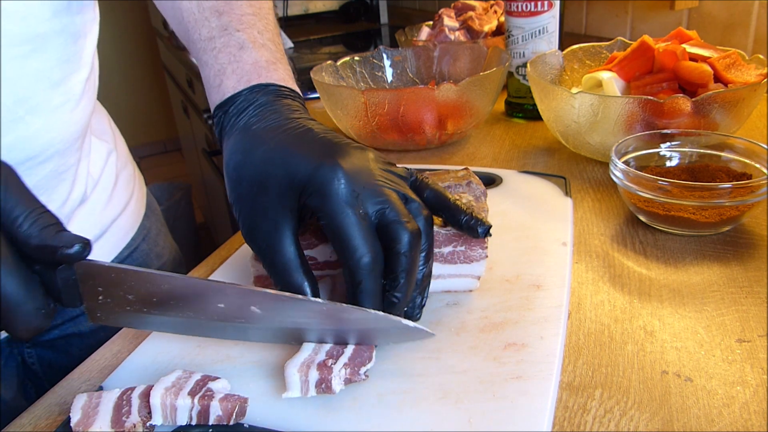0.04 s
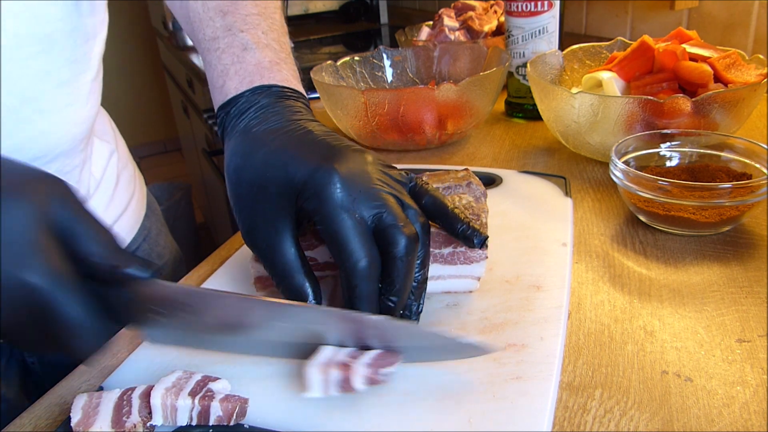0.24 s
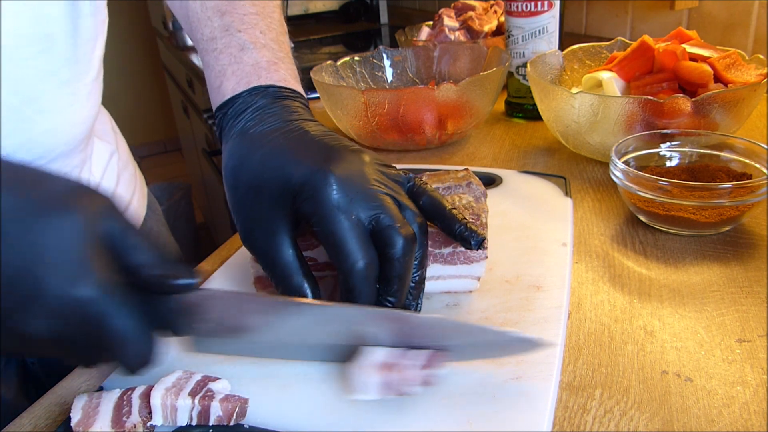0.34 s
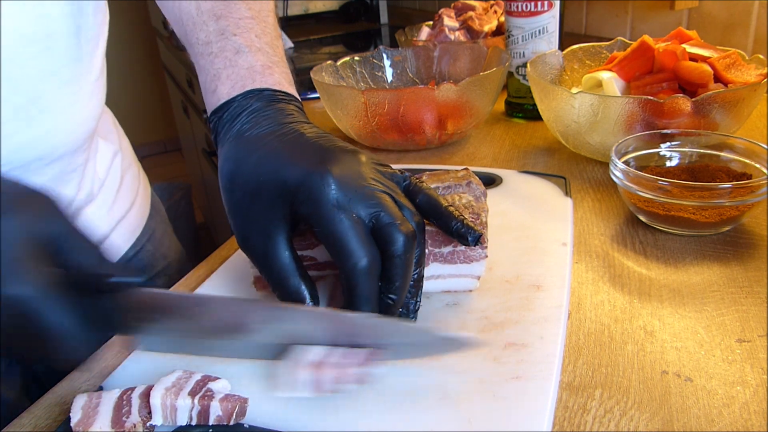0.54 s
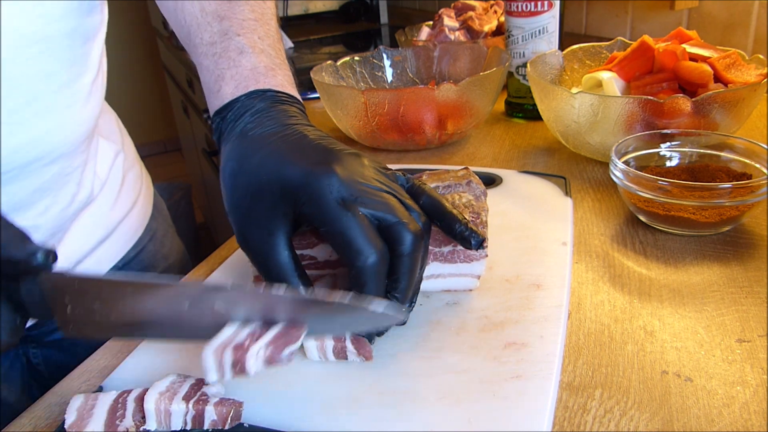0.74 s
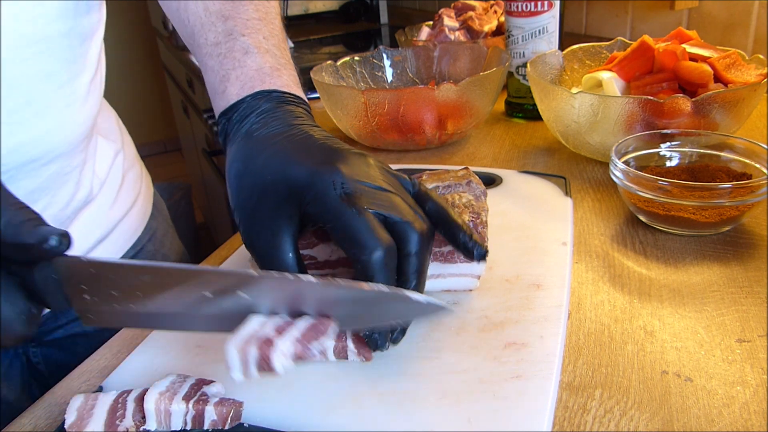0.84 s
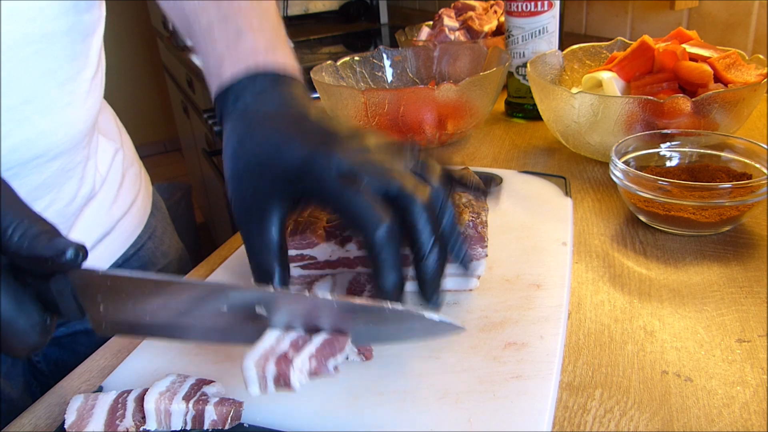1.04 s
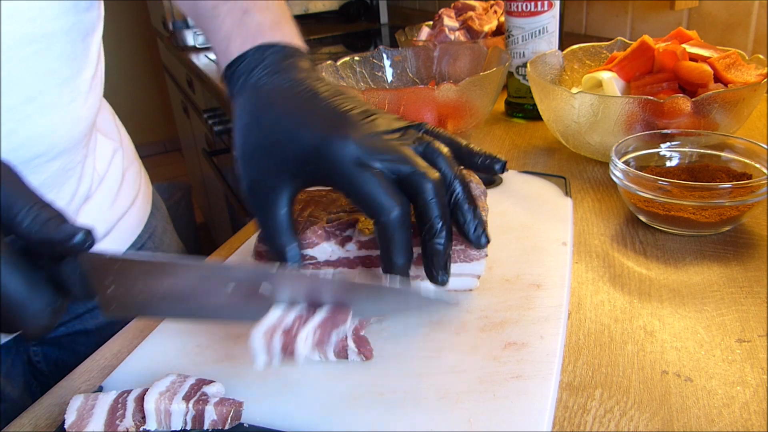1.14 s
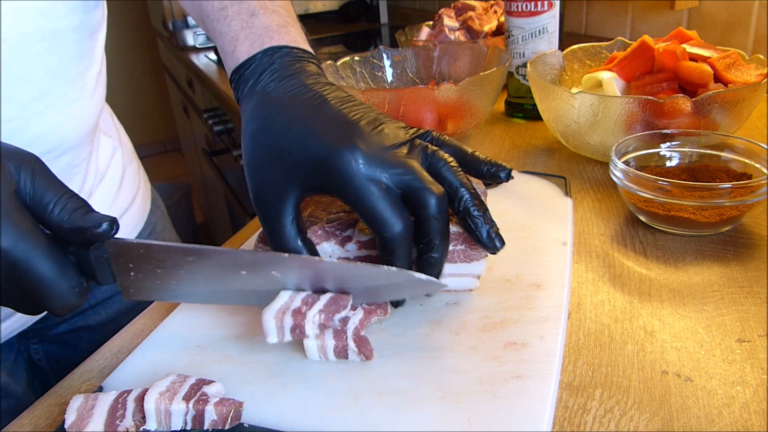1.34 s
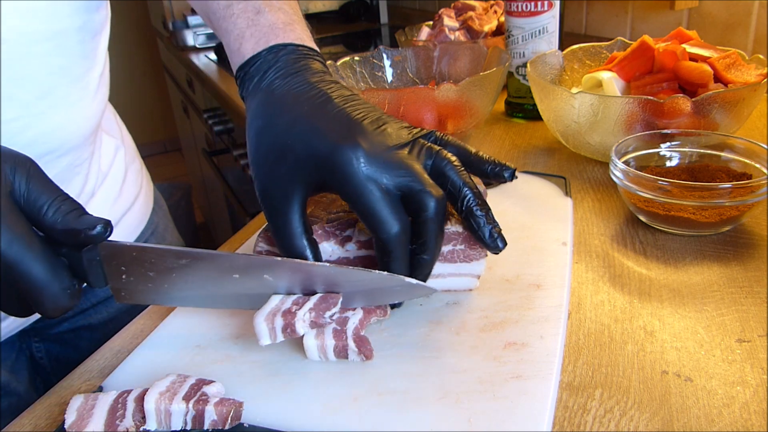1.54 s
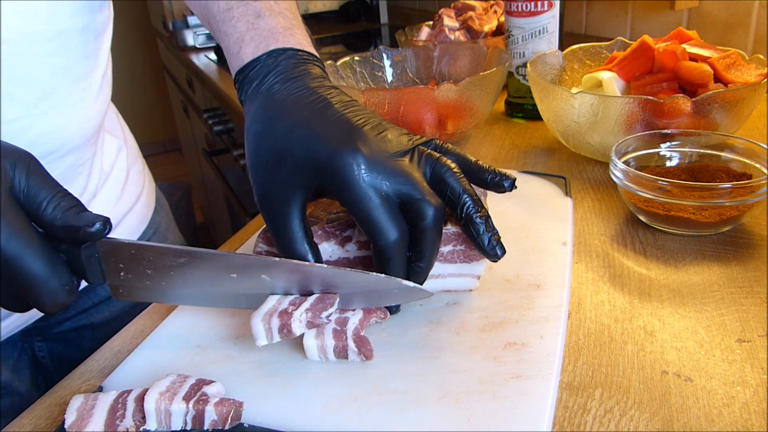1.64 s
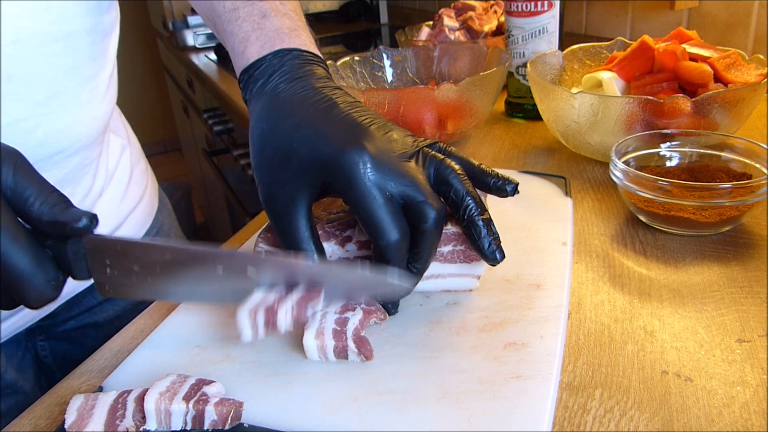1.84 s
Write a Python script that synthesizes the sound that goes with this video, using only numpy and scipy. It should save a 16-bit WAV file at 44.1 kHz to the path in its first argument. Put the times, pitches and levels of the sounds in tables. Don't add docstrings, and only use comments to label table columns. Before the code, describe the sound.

A chef's knife slices bacon in two quick draws, scraping and ringing on a ridged plastic board, the first squeaking thinly; wet crackles follow, then faint glove rustles and finger taps, close stereo microphone, small kitchen.

```python
import sys
import numpy as np
from scipy import signal
from scipy.fft import rfft, irfft, next_fast_len
from scipy.io import wavfile
from scipy.ndimage import uniform_filter1d

SR = 44100
rng = np.random.default_rng(int(sys.argv[2]) if len(sys.argv) > 2 else 0)


def invert_db(x):
    u = np.asarray(x, float) / 20
    return 10 ** u


def wav_out(sig):
    wavfile.write(sys.argv[1], SR, np.round(np.clip(np.atleast_2d(sig).T, -1, 1) * 32767).astype(np.int16))


N = 83790


def seconds():
    return np.arange(N) / SR


def rms_one(x):
    return x / np.sqrt(np.mean(x ** 2) + 1e-20)


def in_time(rows):
    s, *columns = np.transpose(rows)
    return [np.interp(seconds(), s, c) for c in columns]


def fade(rows):
    start, end = rows[0][0], rows[-1][0]
    return np.interp(seconds(), [start - .02, start, end, end + .02], [0, 1, 1, 0])


def bump(centre, reach):
    return np.exp(-.5 * ((seconds() - centre) / reach) ** 2)


def colour(x, points):
    hz, db = np.transpose(points)
    bins = np.arange(N // 2 + 1) * SR / N + 1
    return irfft(rfft(x) * invert_db(np.interp(np.log(bins), np.log(hz), db)), N)


def drift(rate):
    r = np.exp(-2 * np.pi * rate / SR)
    settled = signal.lfilter([1], [1, -2 * r, r * r], rng.standard_normal(N + SR))[SR:]
    return rms_one(settled)


def resonate(x, hz, width_hz):
    r = np.exp(-np.pi * width_hz / SR)
    zeros = [(1 - r * r) / 2, 0, (r * r - 1) / 2]
    poles = [1, -2 * r * np.cos(2 * np.pi * hz / SR), r * r]
    return signal.lfilter(zeros, poles, x + 1e-18)


def grains(per_s, spread_db):
    sizes = invert_db(spread_db * np.minimum(rng.exponential(1, N), 4)) * rng.choice([-1, 1], N)
    return rms_one(sizes * (rng.random(N) < per_s / SR))


def sustained(chatter, hz, width_hz):
    steady_share, steady_s = .7, .012
    ring = rms_one(resonate(chatter, hz, width_hz))
    power = uniform_filter1d(ring ** 2, size=int(steady_s * SR)) + .02
    return rms_one(ring / power ** (steady_share / 2))


# (time [s], pressure [dB], weight on the board [dB], sheen [dB])
FIRST_DRAW = [
    (.14, -83, -1, 3),
    (.2, -56.5, 7, 8.5),
    (.3, -42, 8.5, 1),
    (.34, -38, 2.5, 2),
    (.37, -42, -7, 1.5),
    (.4, -40, -8, 1.5),
    (.455, -40.5, -13, -1),
    (.49, -48, -2, -1.5),
    (.52, -66, 18, 11),
]
SECOND_DRAW = [
    (.5, -60.5, 10, 3),
    (.54, -45.5, -4, -3.5),
    (.6, -36, -1, 0.5),
    (.64, -36.5, -1.5, 1),
    (.7, -40.5, 0, -6),
    (.735, -46.5, 12.5, 2),
    (.77, -54, 11.5, 5),
    (.81, -65, 12, 0),
]
# (frequency [Hz], level [dB per Hz])
FIRST_EDGE = [(110, -59), (180, -15), (290, -21), (677, -8), (901, -14), (1540, -4), (8380, -13),
              (14300, -25.5)]
SECOND_EDGE = [(88, -73), (150, -47), (185, -39.5), (664, -8.5), (1820, -6), (4200, -9), (8230, -14.5),
               (14300, -27)]
# (frequency [Hz], width [Hz], level [dB], time the contact passes [s], reach [s])
FIRST_BODY = [(341, 18, -4, 0.357, 0.032), (665, 14, 0.5, 0.341, 0.047), (670, 53, 1, 0.255, 0.014),
              (1270, 40, -14, 0.5, .03), (1480, 32, 5, 0.477, 0.027), (1618, 35, 1.5, 0.334, 0.018),
              (1540, 43, 2.5, .395, 0.023), (1712, 6, 5.5, 0.42, 0.015), (2320, 55, -1, 0.339, 0.013),
              (2430, 50, -5, .40, .03), (2920, 17, -5, 0.429, 0.036), (3840, 67, -1, 0.363, 0.038),
              (4210, 35, -1, 0.477, 0.034), (6000, 47, 5, 0.51, .015)]
SECOND_BODY = [(1570, 45, 2.5, .535, 0.023), (2410, 190, 1.5, 0.552, 0.047), (683, 12, -4, 0.53, 0.034),
               (668, 12, -5.5, 0.671, 0.048), (950, 64, -4.5, 0.622, 0.043), (1040, 90, -4, 0.703, 0.039),
               (1820, 22, 1.5, 0.62, 0.02), (1758, 29, 0.5, 0.712, 0.04), (2004, 36, -1.5, .68, 0.02),
               (2935, 35, -3.5, 0.665, 0.024), (3930, 220, 2, 0.705, 0.048), (4630, 20, -3.5, .625, 0.014),
               (8200, 900, -3.5, 0.628, 0.063), (1396, 16, 1, 0.728, 0.038)]
BODY_DB, BOARD_HZ, SHEEN_HZ = -7, 875, 6500
RIDGES_PER_S, RIDGE_SPREAD_DB, FLUTTER_DB = 6000, 2, 1.6
STRAY_MODES, STRAY_DB, STRAY_REACH_S, STRAY_CYCLES = 40, -13, .02, 30
DRAW_TOP_HZ = 14300


def draw(rows, edge, body):
    pressure_db, weight_db, sheen_db = in_time(rows)
    start, end = rows[0][0], rows[-1][0]
    chatter = grains(RIDGES_PER_S, RIDGE_SPREAD_DB)
    rings = np.zeros(N)
    for hz, width_hz, db, s, reach in body:
        rings += invert_db(db) * sustained(chatter, hz, width_hz) * bump(s, reach)
    for decades, place in rng.random((STRAY_MODES, 2)):
        hz = 900 * 10 ** decades
        stray = rms_one(resonate(chatter, hz, hz / STRAY_CYCLES))
        stray_gain = invert_db(STRAY_DB - BODY_DB - 6.6 * decades)
        rings += stray_gain * stray * bump(start + place * (end - start), STRAY_REACH_S)
    ridges = grains(RIDGES_PER_S, RIDGE_SPREAD_DB) * invert_db(FLUTTER_DB * drift(38))
    scrape = rms_one(colour(ridges, edge))
    low = signal.sosfilt(signal.butter(2, BOARD_HZ, fs=SR, output="sos"), scrape)
    high = signal.sosfilt(signal.butter(2, SHEEN_HZ, "high", fs=SR, output="sos"), scrape)
    scrape = scrape + (invert_db(weight_db) - 1) * low + (invert_db(sheen_db) - 1) * high
    top_cut = signal.cheby2(10, 40, DRAW_TOP_HZ * 1.04, fs=SR, output="sos")
    return signal.sosfilt(top_cut, scrape + invert_db(BODY_DB) * rings) * invert_db(pressure_db) * fade(rows)


# (time [s], pitch [Hz], lower whistle [dB], upper whistle [dB])
SQUEAK_PATH = [
    (.16, 6250, -68, -95),
    (.19, 7250, -60, -67),
    (.213, 7740, -61, -66),
    (.27, 7700, -59, -67),
    (.303, 8350, -55, -78),
    (.35, 8200, -56, -80),
    (.41, 7300, -56, -75),
    (.455, 6870, -54, -72),
    (.54, 6300, -63, -71),
]
UPPER_OFFSET_HZ, UPPER_CLIMB_HZ_PER_S, SQUEAK_WOBBLE = 3090, 2500, 0.0028


def squeak():
    hz, lower_db, upper_db = in_time(SQUEAK_PATH)
    hz = hz * (1 + SQUEAK_WOBBLE * drift(145))
    lower = np.sin(2 * np.pi * np.cumsum(hz) / SR) * invert_db(lower_db + 1.1 * drift(40))
    upper_hz = hz + UPPER_OFFSET_HZ + UPPER_CLIMB_HZ_PER_S * (seconds() - SQUEAK_PATH[2][0])
    upper = np.sin(2 * np.pi * np.cumsum(upper_hz) / SR) * invert_db(upper_db + 2.9 * drift(40))
    return (lower + upper) * invert_db(3.5) * fade(SQUEAK_PATH)


# (time [s], peak level [dB], pitch [Hz], crackle tail [s])
FAT_SNAPS = [(.339, -34, 2520, 0.0089), (.3835, -33, 2500, .008), (.5247, -42, 2000, .008),
             (0.599, -36, 2330, 0.0089), (0.853, -33.5, 7000, 0.011), (.859, -23, 6000, 0.057),
             (0.86, -49, 6500, 0.0084), (.875, -46, 8500, .05), (0.9172, -32.5, 9700, 0.067),
             (0.9177, -30, 4800, 0.065), (1.19, -39.5, 5500, .008), (1.232, -45, 5500, .01)]
CRACKLE_DB, CRACKLES_PER_S = -16, 7000


def snaps():
    out, fibres, t = np.zeros(N), grains(CRACKLES_PER_S, 2.9), seconds()
    for s, db, hz, tail in FAT_SNAPS:
        burst = invert_db(CRACKLE_DB) * fibres * (t > s) * np.exp(-3 * np.abs(t - s) / tail)
        burst[int(s * SR)] = 1.8
        band = signal.butter(3, [0.57 * hz, min(1.61 * hz, 13000)], "band", fs=SR, output="sos")
        out += invert_db(db) * signal.sosfilt(band, burst + 1e-18)
    return out


# (time [s], level [dB])
HAND_MOVES = [(0, -67), (.03, -61.5), (.16, -58), (.24, -53), (.78, -60.5), (.84, -57.5), (1.0, -64),
              (1.2, -61.5), (1.36, -68.5), (1.45, -59.5), (1.65, -66), (1.75, -60), (1.9, -59)]
# (frequency [Hz], level [dB per Hz])
RUSTLE_COLOUR = [(530, -3), (900, -3), (933, -5), (1380, 0.5), (2100, -2.5), (2420, -9), (5310, -4),
                 (15500, -20.5)]
# (time [s], length [s], level [dB], pitch [Hz])
GLOVE_RUBS = [(1.092, 0.022, -71, 1400), (1.097, 0.028, -67.5, 4900), (1.105, 0.025, -67, 2030),
              (1.147, 0.023, -58, 8300), (1.148, 0.084, -66, 5150), (1.235, 0.017, -77, 1820),
              (1.254, 0.033, -63, 8240), (1.44, 0.047, -69, 5130), (1.553, 0.022, -65, 693),
              (1.562, 0.012, -63, 9500), (1.593, 0.033, -68, 11100), (1.688, 0.013, -64.5, 8200),
              (1.85, 0.18, -62.5, 5160), (1.877, 0.11, -71, 2150)]
RUSTLE_DB, RUB_SHARPNESS = -2.5, 2.5


def hands():
    db, = in_time(HAND_MOVES)
    fine, swells = grains(9000, 3.1), np.zeros(N)
    for s, length, rub_db, hz in GLOVE_RUBS:
        swells += invert_db(rub_db) * rms_one(resonate(fine, hz, hz / RUB_SHARPNESS)) * bump(s, length / 2)
    flicker_db = drift(25)
    rustle = rms_one(colour(grains(9000, 1.47), RUSTLE_COLOUR))
    return invert_db(db + RUSTLE_DB + flicker_db) * rustle + swells


# (time [s], peak level [dB], pitch [Hz])
FINGER_KNOCKS = [
    (1.022, -62, 800),
    (1.084, -52, 1100),
    (1.214, -55, 820),
    (1.224, -52.5, 1760),
    (1.345, -52, 1000),
    (1.391, -55, 3430),
    (1.536, -54.5, 1010),
    (1.55, -56, 3460),
    (1.656, -56, 700),
]
KNOCK_WIDTH_HZ, KNOCK_S = 900, .012


def knocks():
    t, fine, out = seconds(), grains(5000, 2.9), np.zeros(N)
    for s, db, hz in FINGER_KNOCKS:
        thud = rms_one(resonate(fine, hz, min(KNOCK_WIDTH_HZ, 370000.0 / hz)))
        out += invert_db(db - 9) * thud * (t > s) * np.exp(-np.abs(t - s) / KNOCK_S)
    return out


# (multiple of the motor's rate, level [dB rms])
COMPRESSOR = [(2, -90.5), (3, -87), (4, -81.5), (5, -78), (6, -78), (7, -81.5), (9, -79), (10, -76),
              (11, -77.5), (12, -77), (13, -80), (14, -73), (16, -79.5), (18, -76.5), (30, -87)]
# (frequency [Hz], width [Hz], level [dB])
PIPE_WHISTLES = [(2121, 28, -77.5), (3480, 40, -88)]
MOTOR_HZ, WHINE_HZ, WHINE_DB = 48.87, 4862, -77


def fridge():
    t, hum = seconds(), np.zeros(N)
    for k, db in COMPRESSOR:
        waver = invert_db(db + 3.0 + 2.0 * drift(1.7))
        hum += waver * np.sin(2 * np.pi * (k * MOTOR_HZ * t + rng.random()))
    for hz, width_hz, db in PIPE_WHISTLES:
        waver = invert_db(db + 4.9 * drift(3.0))
        hum += waver * rms_one(resonate(rng.standard_normal(N), hz, width_hz))
    whine = np.sin(2 * np.pi * WHINE_HZ * t + 0.55 * drift(25))
    return hum + invert_db(WHINE_DB + 4 + 2.5 * drift(14)) * whine


# (time [s], length [s], level [dB])
DRAUGHT_PUFFS = [(.03, .05, -78), (0.314, .03, -80), (.43, 0.036, -74), (0.497, 0.059, -66.5),
                 (0.762, 0.044, -66), (0.808, 0.034, -70), (.97, 0.068, -73), (1.102, 0.058, -74),
                 (1.194, 0.066, -73), (1.328, 0.079, -73), (1.465, 0.084, -74), (1.563, 0.06, -71),
                 (1.773, 0.048, -80)]
DRAUGHT_DB, DRAUGHT_HZ, DRAUGHT_LUMPS_DB = -95, 105, 1


def draught():
    swell = invert_db(DRAUGHT_DB)
    for s, length, db in DRAUGHT_PUFFS:
        swell = swell + invert_db(db) * bump(s, length / 2)
    lumps = invert_db(DRAUGHT_LUMPS_DB * drift(3.6))
    return swell * lumps * sustained(rng.standard_normal(N), DRAUGHT_HZ, 41)


# (frequency [Hz], level [dB per Hz])
AIR_MID = [(15, -40), (25, -9.5), (39, -44), (140, -49), (260, -29), (631, -16), (1900, -31),
           (10100, -28.5), (15500, -41)]
AIR_SIDE = [(15, -40), (25, -13), (56, -38), (198, -14), (240, -14.5), (684, -7), (1490, -22.5),
            (9810, -31.5), (15500, -38)]
# (frequency [Hz], width [Hz], level [dB])
BOOM = [(610, 38, -71), (700, 36, -76)]
AIR_MID_DB, AIR_SIDE_DB = -62.5, -57


def room_tone():
    mid = invert_db(AIR_MID_DB) * rms_one(colour(rng.standard_normal(N), AIR_MID))
    side = invert_db(AIR_SIDE_DB + drift(0.54)) * rms_one(colour(rng.standard_normal(N), AIR_SIDE))
    for hz, width_hz, db in BOOM:
        waver = invert_db(db + 2.0 * drift(3.4))
        side += waver * rms_one(resonate(rng.standard_normal(N), hz, width_hz))
    return mid + side * [[1], [-1]]


KITCHEN_T60_S, KITCHEN_DB, WALL_CUT_HZ = 0.23, -7, 2400
ECHO_FIRST_S, ECHO_LAST_S = .013, .037


def kitchen(x, count):
    size = next_fast_len(N + SR)
    w = 2 * np.pi * np.arange(size // 2 + 1) / size
    dull = np.abs(1 / (1 + 1j * w * SR / (2 * np.pi * WALL_CUT_HZ))) ** 0.43
    answer = 0
    for k, lag in enumerate(rng.uniform(ECHO_FIRST_S, ECHO_LAST_S, count) * SR):
        loop = invert_db(-60 * lag / SR / KITCHEN_T60_S) * dull * np.exp(-1j * w * int(lag))
        answer = answer + (-1) ** k * loop / (1 - loop)
    return irfft(rfft(x, size) * answer, size)[:N] / np.sqrt(count)


# (frequency [Hz], side minus mid [dB])
SCRAPE_WIDTH = [(60, -15), (180, -7), (550, -4), (1650, -6), (4970, -2), (15000, 7.5)]


def scene():
    board = draw(FIRST_DRAW, FIRST_EDGE, FIRST_BODY) + draw(SECOND_DRAW, SECOND_EDGE, SECOND_BODY)
    board = board + squeak() + snaps() + hands() + knocks()
    mid = board + invert_db(KITCHEN_DB) * kitchen(board, count=10) + fridge() + draught()
    side = invert_db(2.5) * colour(kitchen(board, count=10), SCRAPE_WIDTH)
    return mid + side * [[1], [-1]] + room_tone()


def band_limit(x):
    return signal.sosfilt(signal.butter(12, 15690, fs=SR, output="sos"), x)


def record(dry):
    offset = -.00295
    return band_limit(dry + offset)


dry = scene()
out = record(dry)
wav_out(out)
```